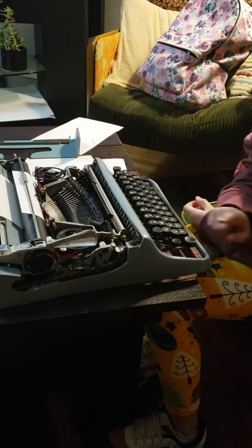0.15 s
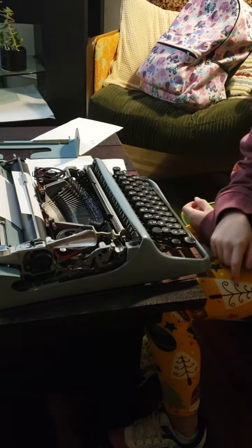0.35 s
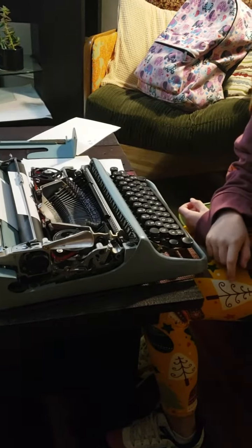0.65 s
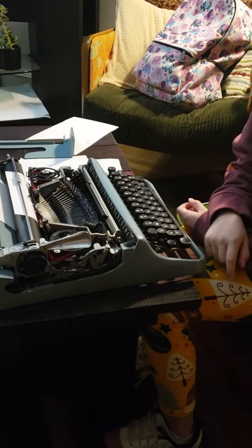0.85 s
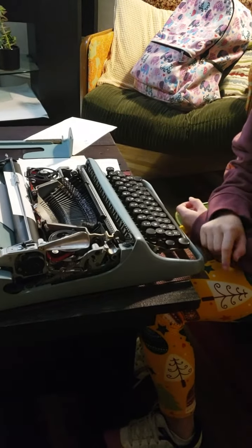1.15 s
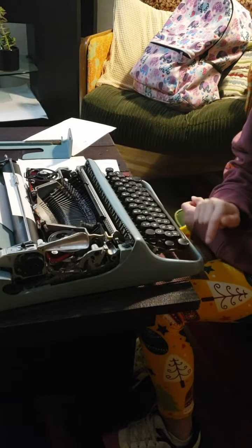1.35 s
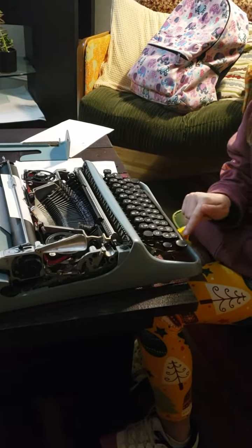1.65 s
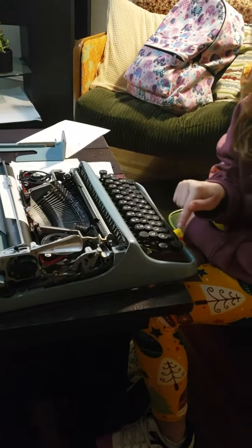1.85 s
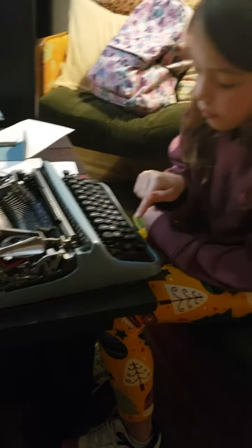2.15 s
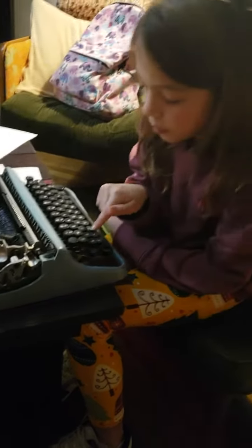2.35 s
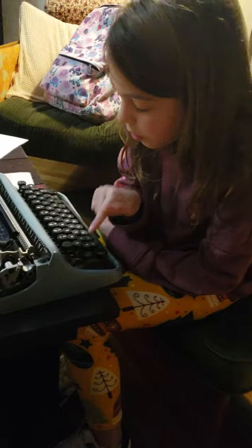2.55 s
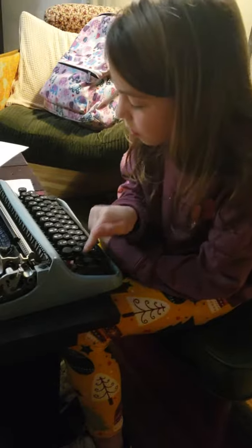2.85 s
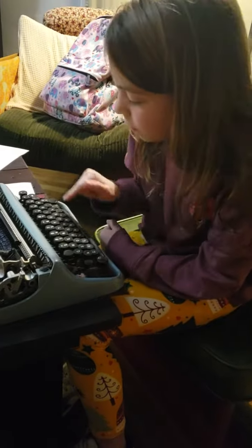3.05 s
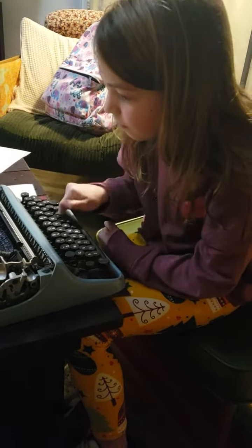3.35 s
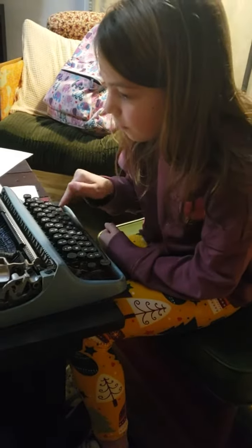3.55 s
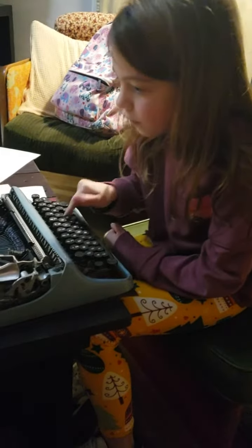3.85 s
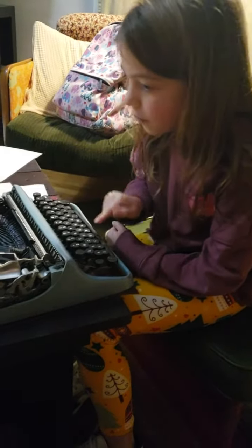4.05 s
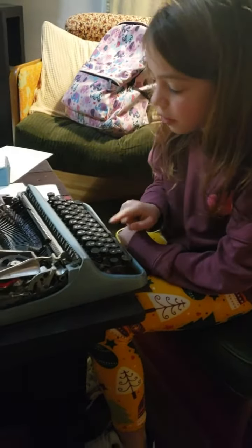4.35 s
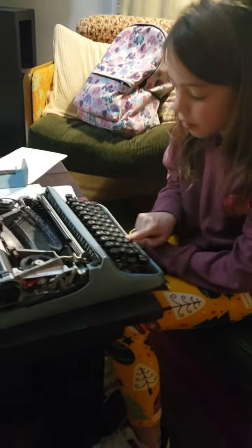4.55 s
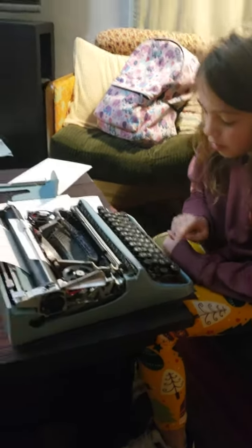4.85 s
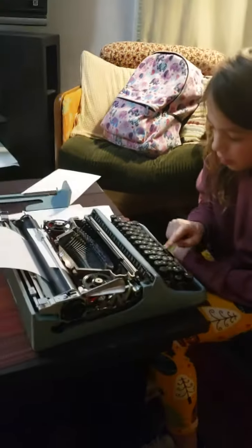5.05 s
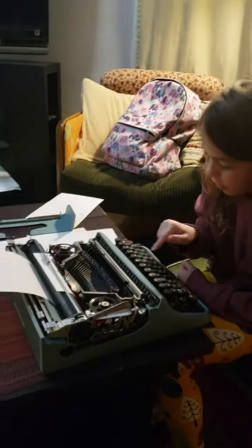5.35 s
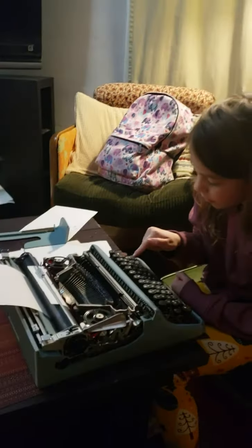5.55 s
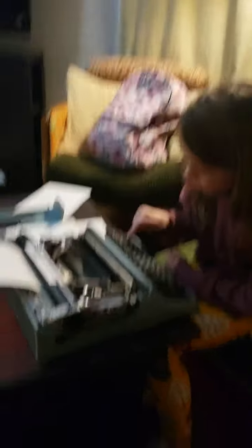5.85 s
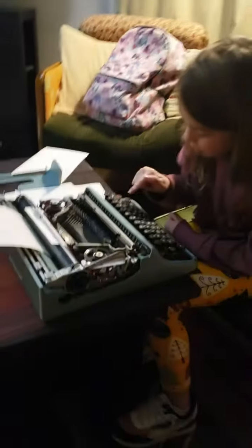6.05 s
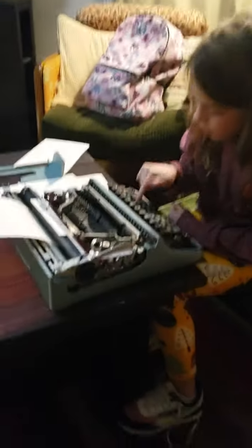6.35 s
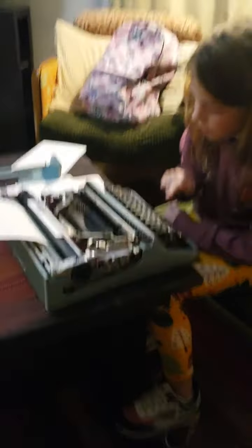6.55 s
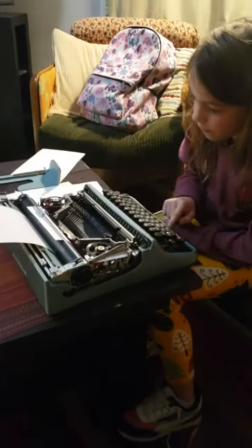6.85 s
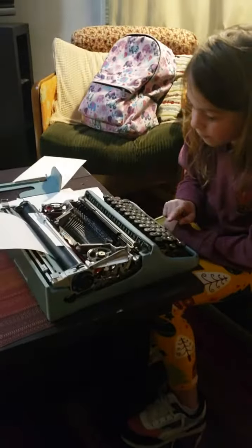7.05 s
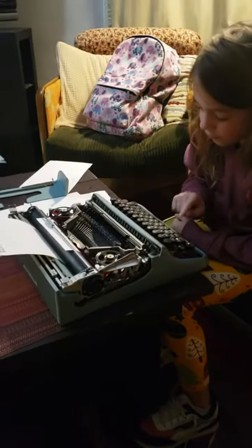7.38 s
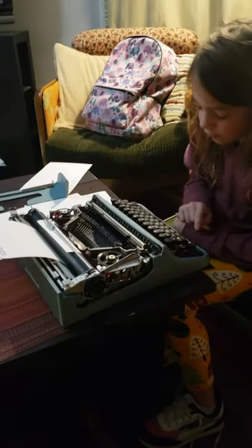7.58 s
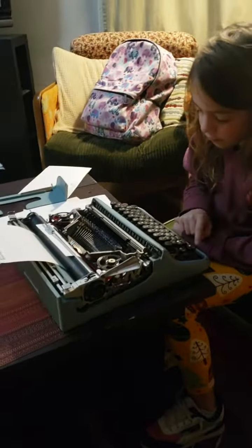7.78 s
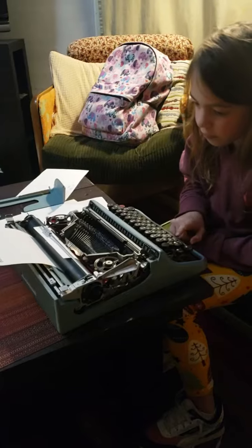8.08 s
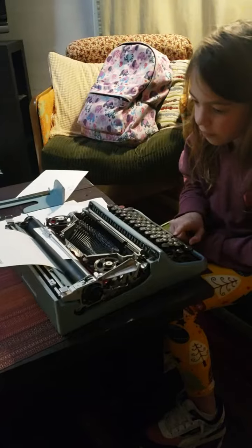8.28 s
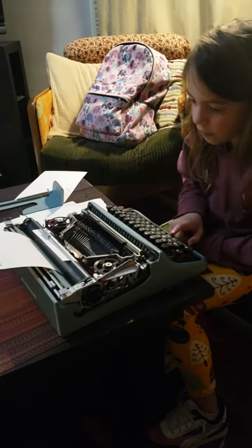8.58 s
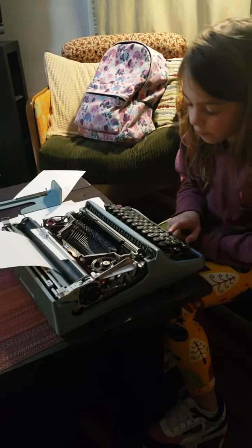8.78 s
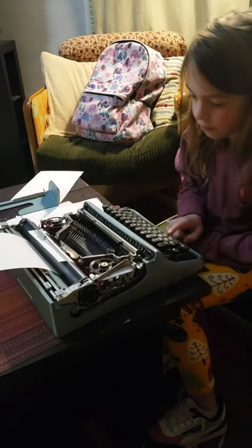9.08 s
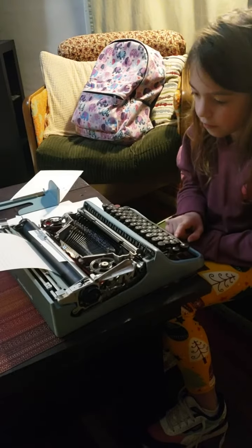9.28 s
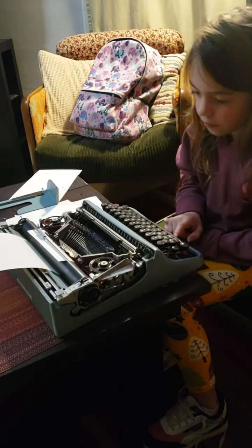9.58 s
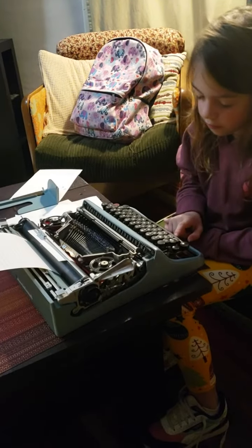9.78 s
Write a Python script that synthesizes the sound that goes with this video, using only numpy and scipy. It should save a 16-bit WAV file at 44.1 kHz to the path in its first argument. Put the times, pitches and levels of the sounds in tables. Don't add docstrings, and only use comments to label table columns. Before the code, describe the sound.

A quiet small room with low uneven motor hum and faint hiss, picked up by a hand-held phone about half a metre from a manual typewriter. At 0 s a soft desk thump and loose metal tick, with a key dropping back around 0.16 s. Faint dull ticks sound across the room at 1 s, then near silence. Sharp, bright metal strikes land at 2.7 and 3.3 s, a softer one at 3.7 s, each bouncing and followed by return clicks, rattles and low desk thuds. A dull space-bar clunk comes at 4.6 s, released at 4.7. From 4.3 to 6 s cloth rustles with small skin pops. The last hard strike hits at 6.2 s, then dense crackling rubs, mostly right, until 7.7 s, with a muted space-bar press at 7.2. Popping bumps recur at 8.1 and 8.3-8.4 s, a brief finger wipe at 8.6, and a final space-bar clunk at 8.95-9.2 before hum remains.

```python
import sys
import numpy as np
from scipy import signal
from scipy.fft import rfft, irfft
from scipy.io import wavfile
from scipy.ndimage import uniform_filter1d

SR = 44100
rng = np.random.default_rng(int(sys.argv[2]) if len(sys.argv) > 2 else 0)


def invert_db(level):
    return 10 ** (np.asarray(level, dtype=float) / 20)


def master_out(mix):
    frames = np.transpose(np.atleast_2d(mix))
    ceiling = np.clip(frames, -1, 1)
    pcm = np.round(ceiling * 32767).astype(np.int16)
    wavfile.write(sys.argv[1], SR, pcm)


N = 437472
LEFT_RIGHT = np.array([[1], [-1]])


def curve(table, col=1, off=-140.):
    rows = np.array(table, float)
    return np.interp(np.arange(N) / SR, rows[:, 0], rows[:, col], off, off)


def shape(x, points):
    hz, db = np.transpose(points)
    f = np.maximum(np.fft.rfftfreq(4096, 1 / SR), 1)
    cepstrum = irfft(np.interp(np.log(f), np.log(hz), db) * np.log(10) / 20)
    cepstrum[1:2048] *= 2
    cepstrum[2049:] = 0
    return signal.oaconvolve(x, irfft(np.exp(rfft(cepstrum))))[:N]


def band(x, lo_hz, hi_hz, order=2):
    return signal.sosfilt(signal.butter(order, [lo_hz, min(hi_hz, .45 * SR)], "band", fs=SR, output="sos"), x)


def unit(x):
    return x / np.sqrt(np.mean(x ** 2))


def fading(times, db, t60, rise=0.):
    energy = np.full(N, 1e-24)
    np.add.at(energy, np.clip((np.array(times) * SR).astype(int), 0, N - 1), invert_db(2 * db))
    energy = signal.lfilter([1], [1, -np.exp(-2 * np.log(1000) / (t60 * SR))], energy)
    lag = np.exp(-1 / (rise * SR + 1e-9))
    return np.sqrt(signal.lfilter([1 - lag], [1, -lag], energy) if rise else energy)


def walk(rate_hz):
    k = max(int(SR / rate_hz), 1)
    held = np.repeat(rng.standard_normal(N // k + 1), k)
    return 0.62 * uniform_filter1d(held, k)[:N]


def pair(like):
    mid, side = rng.standard_normal((2, N))
    like = np.clip(like, 0, 1)
    return (np.sqrt(1 + like) * mid + np.sqrt(1 - like) * side * LEFT_RIGHT) / np.sqrt(2)


# time_s, turn_hz, level_db
MOTOR_DRIFT = [
    (0, 40.33, -62),
    (1.1, 40.19, -67),
    (2.1, 40.2, -61.5),
    (4.2, 39.5, -63.5),
    (5.4, 38.6, -58),
    (7.6, 39.39, -64.5),
    (9.1, 37.6, -60),
    (9.92, 37.1, -69),
]
# multiple, level_db, wobble_db
MOTOR_HARMONICS = [
    (2, 2, 2.5),
    (3, -7.5, 4),
    (4, -16.5, 1),
]


def motor():
    turn_hz = curve(MOTOR_DRIFT, off=39.) * (1 + 0.013 * walk(5.4))
    phase = 2 * np.pi * np.cumsum(turn_hz) / SR
    lines = sum(invert_db(db + wobble_db * walk(7.7)) * np.sin(k * phase + k) for k, db, wobble_db in MOTOR_HARMONICS)
    level_db = curve(MOTOR_DRIFT, col=2, off=-63.)
    return np.sqrt(2) * lines * invert_db(level_db - 1.3 * LEFT_RIGHT)


# freq_hz, density_db (per Hz)
HOUSE_SPECTRUM = [(12, -49.5), (20, -15), (48, -19), (61, -13), (81, -5.5), (130, -18), (182, -20.5),
                  (270, -22.5), (293, -34.5), (328, -22), (357, -36), (499, -42.5), (607, -44), (1260, -50),
                  (16000, -57)]


def house():
    low, high = (signal.butter(2, 480, kind, fs=SR, output="sos") for kind in ("low", "high"))
    rumble = signal.sosfilt(low, pair(0.76)) * invert_db(0.47 * walk(6.3) - 1.5 * LEFT_RIGHT)
    hiss = invert_db(4.5) * signal.sosfilt(high, pair(0))
    floor = unit(np.array([shape(v, HOUSE_SPECTRUM) for v in rumble + hiss]))
    floor = floor - 0.4 * band(floor, 85, 140, order=1)
    shimmer = invert_db(-72.5) * band(pair(0), 11000, 16000)
    return invert_db(-60.0) * floor + shimmer + motor()


# start_s, level_db
KNOCKS = [
    (0.989, -65),
    (1.007, -63.5),
    (1.038, -62.5),
    (1.055, -83),
]


def knock():
    s, db = np.transpose(KNOCKS)
    burst = pair(0.2) * (fading(s, db, 0.014) + fading(s, db - 5.5, 0.21))
    return invert_db(17.5) * band(burst, 380, 1100) + invert_db(7.5) * band(burst, 2600, 3700) + invert_db(3.5) * band(burst, 5700, 6900)


# middle_s, held_s, cloth_db, skin_db (at the right port), pan_db (left minus right)
SHIFTS = [(4.25, .03, -85.5, -91.5, 17), (4.411, 0.016, -70, -69, 12.5), (4.52, 0.081, -65.5, -84, 6),
          (4.87, 0.063, -62.5, -64, -5), (4.94, 0.019, -66.5, -68, 1), (5.044, 0.063, -65, -66, 1),
          (5.197, 0.099, -57, -79, 3), (5.301, 0.056, -68, -77, -6.5), (5.429, 0.026, -72, -74, 0),
          (5.53, 0.031, -73, -73.5, 0), (5.635, 0.059, -73.5, -73.5, -2), (5.82, 0.089, -70, -76, -7.5),
          (5.94, 0.029, -54.5, -55.5, -2), (6.01, 0.044, -67, -95, -5), (6.171, 0.07, -57.5, -63, -5),
          (6.268, 0.053, -52.5, -50, -3.5), (6.375, .05, -55, -41, -11.5), (6.47, 0.089, -70, -55.5, -5),
          (6.598, 0.13, -82, -63, -19.5), (7.009, 0.0965, -97, -75.5, -24), (7.48, 0.074, -77.5, -71.5, 2),
          (7.6, 0.028, -76, -70, -12.5), (7.68, 0.022, -87.5, -70.5, -15)]


def gestures(db):
    swell_db_per_s, fade_db_per_s = 289.5, 214
    t = np.arange(0, N / SR, .002)
    s, held = np.array(SHIFTS)[:, :2].T[:, :, None]
    before = np.maximum(s - held / 2 - t, 0)
    after = np.maximum(t - s - held / 2, 0)
    off_db = swell_db_per_s * before + fade_db_per_s * after
    energy = (invert_db(db[:, None] - off_db) ** 2).sum(axis=0)
    return np.interp(np.arange(N) / SR, t, np.sqrt(energy))


# freq_hz, density_db (per Hz), pan_db (left minus right)
CLOTH = [(710, -58.5, -0.5), (1200, -11, -1), (1380, -16, -0.5), (2530, -8.5, 3.5), (2876, -2, 4.5),
         (4300, -5, -0.5), (5900, -6.5, 5.5), (7020, -3.5, 12.5), (7940, -12.5, 10), (9000, -2, -7),
         (11000, 1, -8.5), (13000, 2, -5), (16000, 5, -2)]
# scrape_db (coarse), sheen_db (fine)
WEAVE = [(-5, 0), (-8, -3), (-2, -1), (6, -1), (-12, -2), (-0.5, 0), (-4.5, 0), (0, -1), (-4, -8), (1, -10),
         (4, -8), (6.5, -11), (2.5, -1), (-10, 1.5), (-6.5, 1), (0, 0), (1, 0), (5, -1), (13, 1.5),
         (2.5, 8), (5, 0), (12.5, 2), (8.5, 0)]
# time_s, level_db
WIPE = [
    (8.583, -85),
    (8.59, -64),
    (8.65, -66),
    (8.71, -65),
    (8.725, -75.5),
]


def hand():
    hz, tone_db, lean_db = np.transpose(CLOTH)
    patches = pair(0.091) * invert_db(0.5 * walk(250))
    hiss = np.array([shape(v, np.c_[hz, tone_db + side * lean_db / 2]) for v, side in zip(patches, (1, -1))])
    edges_hz = (2300, 4300), (4000, 7900), (8900, 11800), (11600, 18000)
    scrape, coarse, thin, sheen = (unit(band(hiss, lo, hi, order=3)) * invert_db(1.5 * walk(12)) for lo, hi in edges_hz)
    scrape_db, sheen_db = np.transpose(WEAVE)
    db, rub_db, pan_db = np.array(SHIFTS)[:, 2:].T
    sides = db + pan_db / 2, db - pan_db / 2
    thin_db = 5.5 - 0.45 * pan_db
    parts = [(scrape, scrape_db - 7.5), (coarse, 0), (thin, thin_db - 4.0), (sheen, thin_db + sheen_db - 5.5)]
    cloth = sum(part * [gestures(v + more_db) for v in sides] for part, more_db in parts)

    skin = unit(band(pair(0.16), 98, 480, order=3))
    skin = skin + invert_db(-15.5) * unit(band(pair(0.1), 30, 100))
    skin = skin + invert_db(-9.0) * unit(band(pair(0.25), 520, 1000))
    skin = skin + invert_db(-10) * unit(band(pair(.25), 1000, 3100))
    skin = skin * gestures(rub_db) * invert_db(1.1 * walk(60) + np.array([[-9], [5]]))

    wipe = unit(band(pair(0.19), 950, 1700))
    wipe = wipe + 0.49 * unit(band(pair(0.22), 400, 900))
    wipe = wipe + 0.142 * unit(band(pair(.2), 2300, 4500))
    return cloth + skin + wipe * invert_db(curve(WIPE) + np.array([[-3], [4]]))


# start_s, level_db, push_ms
POPS = [(4.355, -40, 0.71), (4.408, -47.5, .5), (4.4173, -44, 0.47), (4.43, -47, 0.46), (4.9422, -45, .4),
        (5.045, -44, .4), (4.862, -38, 0.42), (5.345, -40.5, 0.7), (5.51, -43.5, 0.9), (5.89, -43.5, .45),
        (5.5847, -40, 0.8), (5.7226, -40, 0.82), (5.7594, -38.5, 0.78), (5.9523, -38, 0.14),
        (5.9644, -41, 0.19), (5.9762, -33.5, 0.12), (6.1681, -39, 0.17), (6.5358, -39, 0.43),
        (6.8187, -37.5, 0.42), (7.0689, -36.5, 0.74), (7.1048, -40, 0.89), (7.1405, -32, 1.03),
        (7.181, -31, 0.8), (7.2498, -25, 0.12), (7.271, -28.5, 1.2), (7.491, -49.5, 0.4),
        (7.5695, -47, 0.36), (6.107, -62, 0.095), (5.025, -43, 0.5), (7.4118, -31, 0.4),
        (7.4391, -33.5, 0.46), (7.5888, -43.5, 0.49), (7.648, -44, 0.22), (7.6788, -39, 0.25),
        (8.04, -45, 0.17), (8.062, -42.5, 0.27), (8.0668, -24.5, 0.84), (8.0835, -23.5, 0.19),
        (8.09, -28, 0.42), (8.3216, -28.5, 0.77), (8.3383, -34, 0.34), (8.3425, -25.5, 0.32),
        (8.4136, -28, 0.88), (8.4234, -21, 0.07), (8.4375, -25, 1.13), (8.4442, -20.5, 0.07),
        (8.842, -40, 1.1)]
# start_s, level_db, push_ms
RUN_SLIPS = [(6.3036, -29, 0.37), (6.3081, -31, 0.35), (6.3157, -28, 0.37), (6.3218, -33, 0.35),
             (6.342, -30, 0.46), (6.3533, -29, 0.2), (6.3706, -29.5, 0.26), (6.3776, -32, 0.37),
             (6.3858, -28, 0.27), (6.393, -32, 0.32), (6.3973, -27, 0.31), (6.4134, -37.5, 0.46),
             (6.591, -34.5, 0.41), (6.599, -36, 0.7), (6.619, -35, 0.85), (6.634, -42, 0.44),
             (6.643, -31.5, 0.73), (6.653, -33, 1), (6.666, -35, 0.48), (6.686, -37.5, 0.73),
             (6.857, -33.5, 0.48), (6.876, -36, 0.55), (6.893, -33.5, 0.54), (6.912, -34.5, 0.6),
             (6.926, -35, 0.43), (6.937, -39.5, 0.46), (6.947, -31, 0.77), (6.965, -41.5, 0.51),
             (7.204, -32.5, 0.56), (7.223, -34, 0.45), (7.235, -31.5, 1)]
# start_s, end_s, first_rate_hz, last_rate_hz, level_db
DRAGS = [
    (6.512, 6.593, 60, 83.5, -42.5),
]


def slips():
    jitter, scatter_db, push_ms, push_spread = .13, 2, .5, .22
    rows = POPS + [(s + 0.00157, db + 4, ms) for s, db, ms in RUN_SLIPS]
    chance = rng.standard_normal((len(DRAGS), 3, 24))
    for (start, end, first, last, db), c in zip(DRAGS, chance):
        count = (end - start) * (first + last) / 2
        rate_hz = np.interp(np.arange(len(c[0])), [0, count], [first, last])
        gaps = np.exp(jitter * c[0]) / rate_hz
        s = start + np.cumsum(gaps) - gaps
        run = np.c_[s, db + scatter_db * c[1], push_ms * np.exp(push_spread * c[2])]
        rows += list(run[s < end])
    return rows


# freq_hz, width_hz, level_db
GRIT = [(2992, 690, -30.5), (4330, 500, -38), (10140, 2200, -31)]


def port_pops():
    half = 400
    t = np.arange(-half, half) / SR
    out, snap = np.zeros((2, N + 2 * half))
    for s, db, ms in slips():
        i = int(s * SR)
        tip = 0.00001 + 0.0013 * ms ** 2
        out[i:i + len(t)] += invert_db(db + 6.5) * np.exp((tip - np.hypot(t, tip)) / (0.00016 + 0.00075 * ms))
        snap_db = db + 4.5 - 20 * abs(ms - 0.45)
        snap[i:i + len(t)] += invert_db(snap_db) / np.cosh(t / 0.0004)
    push, noise = out[half:N + half], rng.standard_normal(N)
    scratch = signal.lfilter([1], [1, -np.exp(-1 / (0.0011 * SR))], snap[half:N + half]) * invert_db(-21) * noise
    grit = sum(invert_db(db) * band(scratch, hz - width / 2, hz + width / 2) for hz, width, db in GRIT)
    swing = signal.sosfilt(signal.butter(3, 110, "high", fs=SR, output="sos"), push)
    ring_hz, ring_width_hz = 9630, 1080
    port_ring = invert_db(21.5) * band(push, ring_hz - ring_width_hz / 2, ring_hz + ring_width_hz / 2)
    return (swing + grit + port_ring) * invert_db(np.array([[-33], [0]]))


# start_s, level_db
THUMPS = [(0.0, -32), (0.126, -42), (0.136, -34), (0.157, -26), (0.199, -41), (2.644, -39), (2.685, -31),
          (2.718, -30), (2.932, -31.5), (2.986, -36), (3.336, -34), (3.377, -37), (3.459, -43),
          (3.538, -35), (3.719, -36.5), (3.758, -37), (3.971, -36), (4.331, -49), (4.381, -47),
          (4.581, -26), (4.619, -33), (4.736, -37), (4.769, -33), (6.223, -35), (6.269, -33), (6.357, -50),
          (6.455, -37.5), (7.229, -34.5), (7.348, -36), (7.389, -34), (8.951, -35), (8.989, -31),
          (9.148, -35.5), (9.19, -34.5)]
# freq_hz, level_db, t60_s
DESK_MODES = [(119.2, 0, 0.27), (132.3, -2.5, 0.22), (200, -6, 0.13), (225.3, -7.5, 0.29),
              (284.4, -11, 0.23), (407, -15.5, 0.082), (593, -22.5, 0.068)]


def desk():
    s, db = np.transpose(THUMPS)
    chance = rng.standard_normal((len(s), 2 * len(DESK_MODES)))
    t, out = np.arange(SR // 2) / SR, np.zeros(N + SR)
    hz, mode_db, t60 = np.array(DESK_MODES)[:, :, None].transpose(1, 0, 2)
    for start, level_db, c in zip(s, db, chance):
        detune, vary = c[::2, None], c[1::2, None]
        ring = np.sin(2 * np.pi * hz * (1 + 0.06 * detune) * t + 3 * vary) * np.exp(-np.log(1000) * t / t60)
        blow = (invert_db(mode_db + 2.3 * vary) * ring).sum(axis=0)
        i = int(start * SR)
        out[i:i + len(t)] += invert_db(level_db - 3.5) * np.minimum(t / 0.0057, 1) * blow
    boom = pair(0.37) * fading(s, db, 0.28, 0.014)
    wash = invert_db(7.5) * band(boom, 82, 280) + invert_db(-7.0) * band(boom, 260, 680)
    return (out[:N] + wash) * invert_db(-1.6 * LEFT_RIGHT)


# start_s, level_db, pitch_hz, held_ms
LEVERS = [
    (2.646, -48, 1060, 15),
    (2.704, -40, 1420, 8),
    (6.364, -36.5, 2500, 8),
    (6.436, -36.5, 3550, 7),
    (3.518, -46, 1500, 8),
]


def levers():
    t, out = np.arange(2048) / SR, np.zeros(N)
    noise = rng.standard_normal((len(LEVERS), 2048))
    for (s, db, hz, ms), rub in zip(LEVERS, noise):
        held = np.clip(t / .002, 0, 1) * np.exp(-np.maximum(t - ms / 1e3, 0) / .004)
        note = np.sin(2 * np.pi * hz * t) + .4 * unit(band(rub, .93 * hz, 1.07 * hz))
        i = int(s * SR)
        out[i:i + len(t)] += invert_db(db) * held * note
    return out * invert_db(1.5 * LEFT_RIGHT)


# land_s, level_db, take_up_ms (key, before), swing_ms (bar past guide, before), bounce_db
STROKES = [
    (2.6754, -10, 33.5, 6, -2),
    (3.3324, -10.5, 30.5, 10, 0.5),
    (3.715, -17, 40, 11, -0.5),
    (6.2211, -10.5, 30, 11.6, 1),
]
# after_ms, click_db, edge_db, edge_pan_db (left minus right)
BOUNCES = [
    (0, -0.5, 4.5, -1),
    (9.98, -16, -0.5, 7),
    (13.37, -12, 3.5, 6.5),
    (16.25, -23, -4, 8),
    (25.8, -17.5, -12, 6.5),
]
# start_s, level_db
ESCAPES = [
    (3.4663, -33),
    (3.8587, -45.5),
    (6.3617, -30),
]
# rest_s (bar drops on its rest), level_db, fall_ms, rebound_ms, rebound_db
RETURNS = [
    (0.1623, -25.5, 30, 60, -70),
    (2.9308, -28, 27.5, 51, -29.5),
    (3.5456, -28.5, 26.5, 89, -42),
    (3.9555, -26.5, 30, 88, -40),
    (6.446, -28, 40, 61, -63),
]
# touch_s, touch_db, travel_ms, stop_db
SPACES = [
    (4.574, -35, 36, -36),
    (4.7223, -40.5, 32.8, -32.5),
    (7.226, -46, 27, -44),
    (7.348, -39, 30, -44.5),
    (8.946, -41.5, 32, -37),
    (9.1432, -44.5, 36, -35),
]
# start_s, level_db, treble_db (over middle)
TICKS = [(0.0005, -32.5, 1), (0.006, -36, -2), (0.12, -40.5, -2), (2.379, -60.5, 26), (2.6588, -38, 12),
         (2.719, -27.5, -5), (2.873, -54, 17.5), (2.884, -45, 14), (3.9005, -43, 10), (4.4349, -56.5, 4.5),
         (4.568, -43, 0), (4.826, -47, -5), (3.455, -46, 8), (3.477, -51, 0), (3.485, -53, 9),
         (3.5015, -46, 13.5), (3.52, -33, 4), (3.5225, -43, -1), (3.5366, -29, 14), (3.559, -37, 17),
         (3.645, -62, 6), (3.673, -47, 9), (3.683, -48, 6), (3.695, -41, 17), (3.7624, -30.5, 0),
         (3.926, -53.5, 12), (3.934, -40, 17), (3.9162, -44, 10), (3.9655, -37.5, 13), (3.97, -34, 19),
         (4.054, -68, 10), (6.2155, -27, 7), (6.247, -29.5, -6.5), (6.2525, -28.5, -5),
         (6.2705, -30.5, -7.5), (6.368, -37, -12), (2.7045, -28.5, -2), (3.72, -30, 7), (6.439, -38.5, -13),
         (5.3555, -58, 8), (5.582, -56, 8.5), (5.5133, -64, 4.5), (5.7221, -66, 15), (5.7395, -52, 9),
         (5.831, -62, 0), (5.9092, -46, 11), (5.9192, -39, 13), (5.94, -44, 3.5), (6.1536, -50, 14),
         (4.403, -64.5, 7), (7.322, -44, 1), (7.339, -40, -6), (8.937, -62, 1), (7.571, -69, -3),
         (7.584, -52, 6.5), (9.002, -70, -18), (9.1734, -40, -7)]
# pan_db (left minus right), treble_db (over middle), rattle_db
COLOUR = dict(take_up=(0, 4.3, 4.8), swing=(0.91, 4, 0), land=(5.2, 7.2, -1.6), bounce=(7, 1.7, -0.82),
          escape=(2.5, 2.5, 1), unlatch=(0, -0.72, 6), brush=(4.2, 2, 15), rest=(-1.2, 3.5, -6),
          rebound=(6.64, 9.7, -0.8), touch=(4.7, 4, 7.2), stop=(3.8, 0.39, 3.6), settle=(3.7, 0.84, -0.92),
          tick=(0.94, 0, -1))


def contacts():
    rows = []

    def hit(s, db, part, treble_db=0, hard=0):
        rows.append((s, db, *np.add(COLOUR[part], (0, treble_db, 0)), hard))

    for s, db, take_up_ms, swing_ms, bounce_db in STROKES:
        hit(s - take_up_ms / 1e3, db - 29.5, "take_up")
        hit(s - swing_ms / 1e3, db - 20, "swing")
        for k, (ms, less_db, *_) in enumerate(BOUNCES):
            hit(s + (ms + 1) / 1e3, db + less_db + bounce_db * (k > 0), "bounce" if k else "land", hard=k < 4)
    for s, db in ESCAPES:
        hit(s, db, "escape")
    for s, db, fall_ms, rebound_ms, rebound_db in RETURNS:
        hit(s - fall_ms / 1e3, db - 16, "unlatch")
        hit(s - 0.53 * fall_ms / 1e3, db - 14.5, "brush")
        hit(s, db, "rest", hard=0.27)
        hit(s + .0095, db - 9.5, "settle")
        hit(s + rebound_ms / 1e3, rebound_db, "rebound")
    for s, touch_db, travel_ms, stop_db in SPACES:
        stop_s = s + travel_ms / 1e3
        hit(s, touch_db, "touch")
        hit(stop_s, stop_db, "stop")
        hit(stop_s + 0.017, stop_db + 0.5, "settle")
    for s, db, treble_db in TICKS:
        hit(s, db, "tick", treble_db)
    return np.transpose(rows)


# freq_hz, pan_db (left minus right)
PORTS = [(60, -3.5), (110, -3.0), (200, -7.5), (380, -1), (700, 2.5), (1290, 6.5), (2380, 1), (4400, 13),
         (8120, 9), (15000, -7.5)]


def port_lean(hz):
    ports_hz, pan_db = np.transpose(PORTS)
    return np.interp(np.log(hz), np.log(ports_hz), pan_db)


# freq_hz, level_db (relative to contact), t60_s
FRAME_MODES = [(460, -35, 0.16), (618, -37, 0.4), (960, -33.5, .12), (1070, -39.5, 0.14),
               (1417, -31.5, .09), (2190, -28.5, 0.071), (3410, -30.5, .05), (6360, -27.5, .04),
               (6980, -28, .04), (9390, -25, 0.06), (5630, -29.5, 0.05)]


def frame():
    s, db, _, treble_db = contacts()[:4]
    db = db - np.maximum(treble_db, 0)
    share, out = rng.standard_normal((len(s), len(FRAME_MODES))), np.zeros((2, N))
    nudges = pair(.4)
    for (hz, mode_db, t60), c in zip(FRAME_MODES, share.T):
        soften_db = -.4 * (db + 31.5) * (hz < 2400)
        push = nudges * fading(s, db + soften_db + mode_db + 4.8 * np.clip(c, -2, 1), 0.083)
        r, angle = np.exp(-np.log(1000) / (t60 * SR)), 2 * np.pi * hz / SR
        ring = signal.lfilter([np.sqrt(1 - r) * np.sin(angle)], [1, -2 * r * np.cos(angle), r * r], push)
        out += ring * invert_db(10.5 + port_lean(hz) * LEFT_RIGHT / 2)
    return out


# freq_hz, width_hz, left_db, right_db
RINGS = [(2200, 360, -16, -22), (3630, 410, -2, -20), (5530, 700, 0.5, -10), (7010, 440, -1, -13.5),
         (9420, 180, -15.5, -1), (12900, 1700, -3.5, 0), (14900, 1500, -14, -15.5)]
LIGHT_RING_DB = [-1, -2.5, -4.5, -3.5, -9.5, 13, 16]
BOUNCE_RING_DB = [-4, -2.5, 4, 1.5, -6, 1, -1]
# after_ms, level_db
CHATTER = [
    (0.7, 3.5),
    (1.4, -3.5),
    (2.2, -4.5),
    (4.4, -9.5),
]


def strikes():
    t, out = np.arange(1536) / SR, np.zeros((2, N))
    # start_s, level_db, pan_db, light part, bounce
    edges = [(s + ms / 1e3, db + edge_db + bounce_db * (ms > 0), lean_db, 0, ms > 0)
             for s, db, *_, bounce_db in STROKES for ms, _, edge_db, lean_db in BOUNCES]
    edges += [(s, db + 11.5, 1.5, 1, 0) for s, db, *_ in RETURNS]
    edges += [(s, db + 4, 3, 1, 0) for s, db in ESCAPES]
    edges += [(s + ms / 1e3, db + 2.5, 3, 1, 0) for s, _, _, ms, db in RETURNS]
    late_ms, late_db = np.transpose(CHATTER)
    chance = rng.standard_normal((len(edges), len(RINGS), 4 + len(CHATTER)))
    for (start, db, lean_db, light, bounce), c in zip(edges, chance):
        i = int((start + .0003) * SR)
        for (hz, width, *side_db), row, light_db, again_db in zip(RINGS, c, LIGHT_RING_DB, BOUNCE_RING_DB):
            touches = np.zeros(256)
            touches[0] = 1
            late = (late_ms * SR / 1e3 + 3 * row[4:]).astype(int)
            touches[np.clip(late, 1, 255)] = invert_db(late_db - 10 * bounce - 5 * light)
            ring_hz = hz * (1 + 0.38 * width / hz * row[0])
            ring = np.sin(2 * np.pi * ring_hz * t + 2 * row[2:4, None]) * np.exp(-np.pi * width * t)
            onset = np.sin(np.pi / 2 * np.minimum(t * hz / 2.5, 1)) ** 2
            ring = signal.lfilter(touches, [1], ring * onset)
            ring_db = db + .6 * row[1] + light_db * light + again_db * bounce
            out[:, i:i + len(t)] += ring * invert_db(ring_db + np.c_[side_db] + np.array([[.5], [-1]]) * lean_db)
    return out


# freq_hz, density_db (per Hz)
METAL = [(210, -38.5), (350, -9.5), (539, -24), (1280, -19), (1970, -15.5), (3080, -5), (3450, 1),
         (3980, 3), (6970, 2), (8310, -13), (9450, -6.5), (11200, -7), (13400, -8), (16000, -14)]


def typewriter():
    s, db, pan_db, treble_db, loose_db, hard = contacts()
    crack, rattle = np.sign(pair(0.39)), pair(0.14)
    middle_db = db - 10 * np.log10(1 + invert_db(2 * treble_db))
    low_db = -8.5 - 0.27 * (db + 37.5)
    # low_hz, high_hz, click_db, crack_db, crack_t60_s, rattle_db, rattle_t60_s
    layers = [(348, 1925, middle_db + low_db, 6.5, 0.03, -4.5, 0.24),
              (2440, 8100, middle_db, 6.5, 0.011, -9.0, 0.27),
              (8300, 15000, middle_db + treble_db, 3.5, 0.012, -9.0, 0.22)]
    hz, tone_db = np.transpose(METAL)
    plain, out = shape(crack[0, :SR], METAL), np.zeros((2, N))
    for lo, hi, level_db, crack_db, crack_t60, rattle_db, rattle_t60 in layers:
        grain = invert_db(2.9 * walk(350))
        norm = np.std(band(plain[:SR], lo, hi, order=3))
        edge_db = 11 * hard * (lo > 1000)
        for ch, side in enumerate((1, -1)):
            near_db = level_db + crack_db - edge_db + side * (pan_db - 4.5) / 2
            far_db = level_db + rattle_db + loose_db + side * 0.52 * (pan_db - 1.0) / 2
            near = crack[ch] * fading(s, near_db, crack_t60, 0.00015)
            loose = rattle[ch] * grain * fading(s, far_db, rattle_t60, 0.0023)
            out[ch] += band(near + loose, lo, hi, order=3) / norm
    for ch, side in enumerate((1, -1)):
        out[ch] = shape(out[ch], np.transpose([hz, tone_db + side * port_lean(hz) / 2]))
    out[1] = np.roll(out[1], 6)
    return out


def scene():
    around = house() + knock() + hand() + port_pops()
    machine = desk() + levers() + frame() + strikes() + typewriter()
    return around + machine


def band_limit(x):
    return signal.sosfilt(signal.butter(12, 16970, fs=SR, output="sos"), x)


def record(dry):
    loud = np.tanh(0.68 * dry) / 0.72
    dull = signal.sosfiltfilt(signal.ellip(8, .1, 40, 15800, fs=SR, output="sos"), loud)
    opening = np.clip(8 * uniform_filter1d(np.abs(loud), 256), 0, 1)
    return band_limit(dull + invert_db(-11.0) * (loud - dull) * opening)


dry = scene()
out = record(dry)
master_out(out)
```